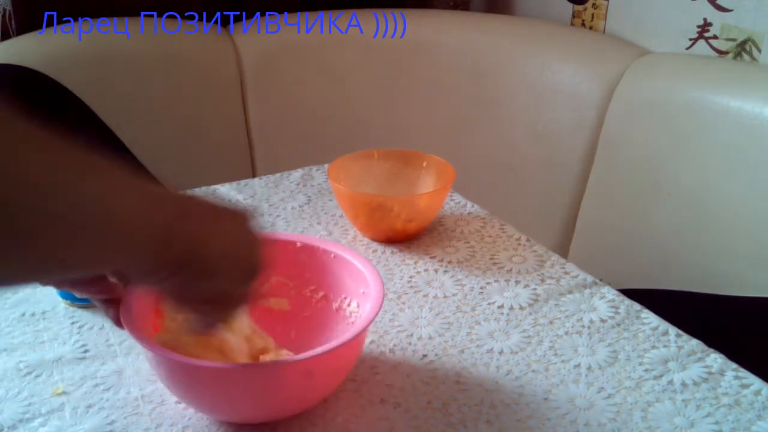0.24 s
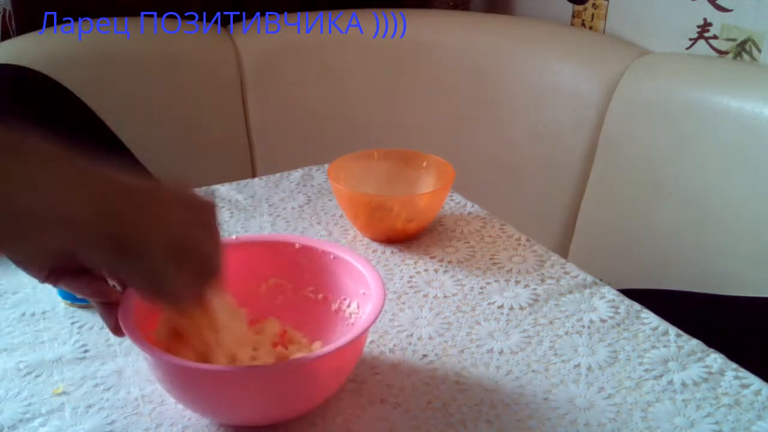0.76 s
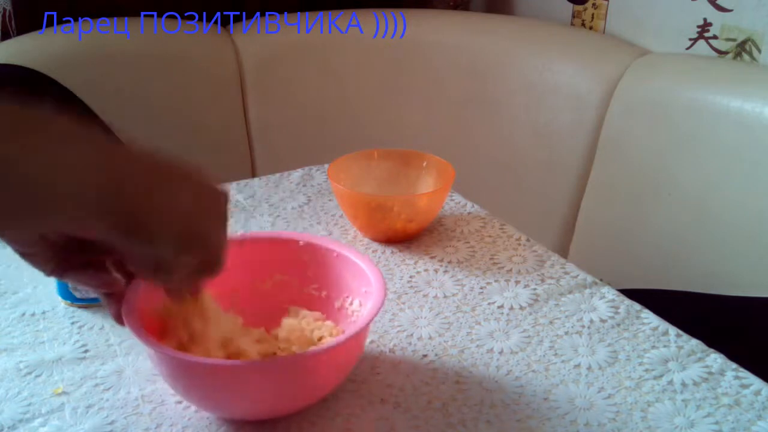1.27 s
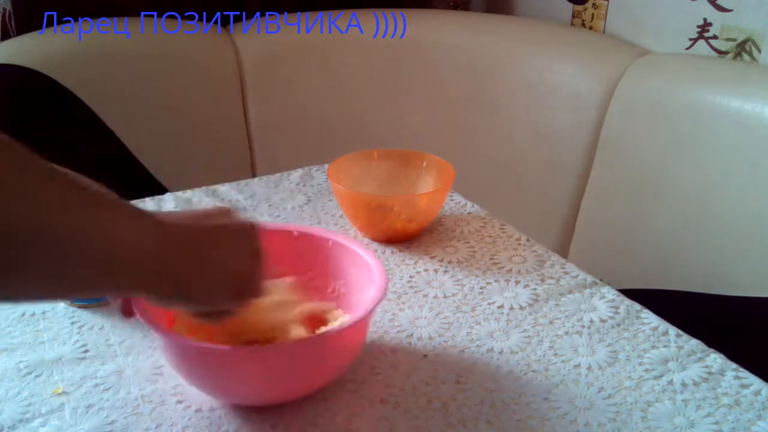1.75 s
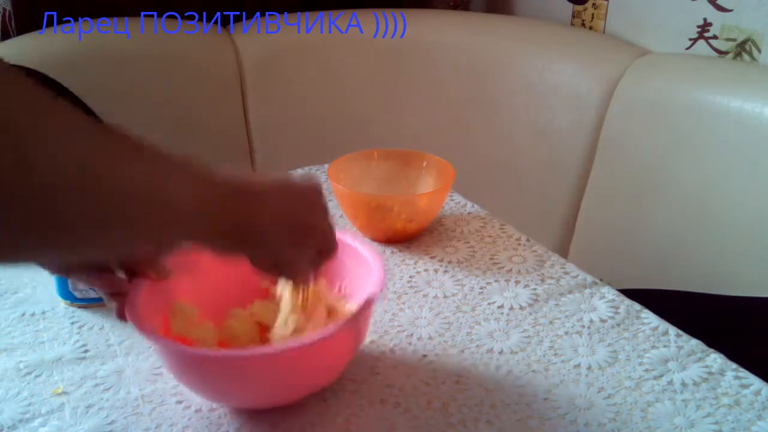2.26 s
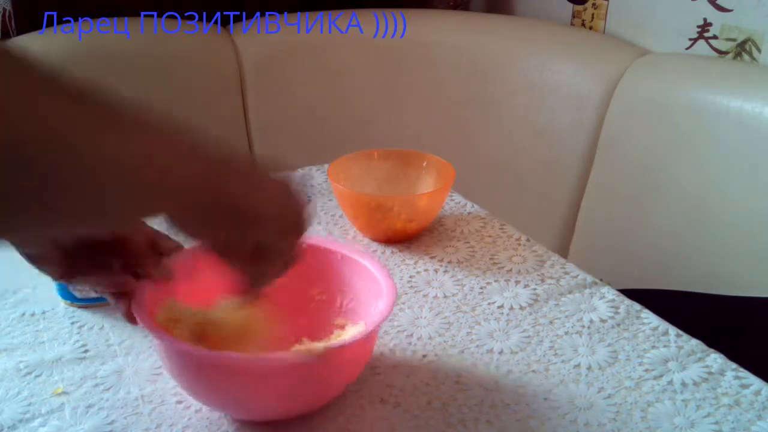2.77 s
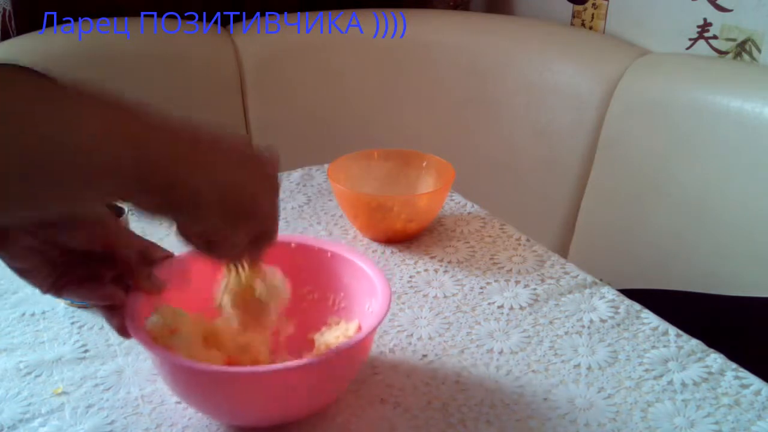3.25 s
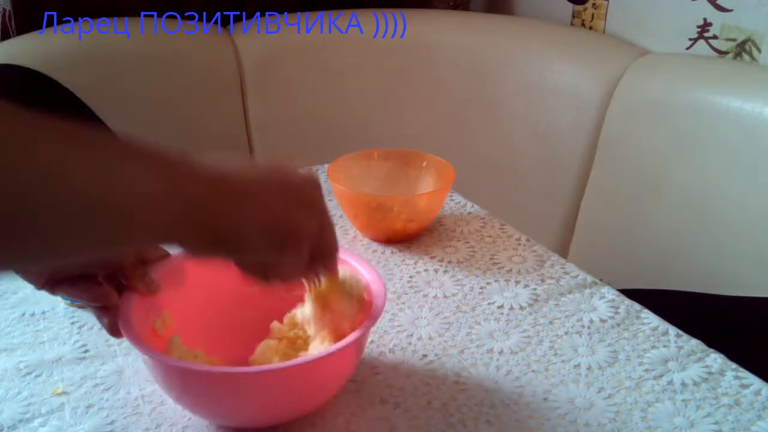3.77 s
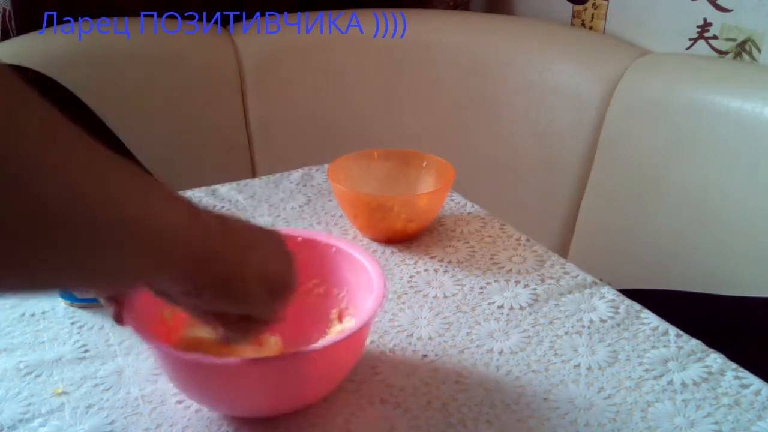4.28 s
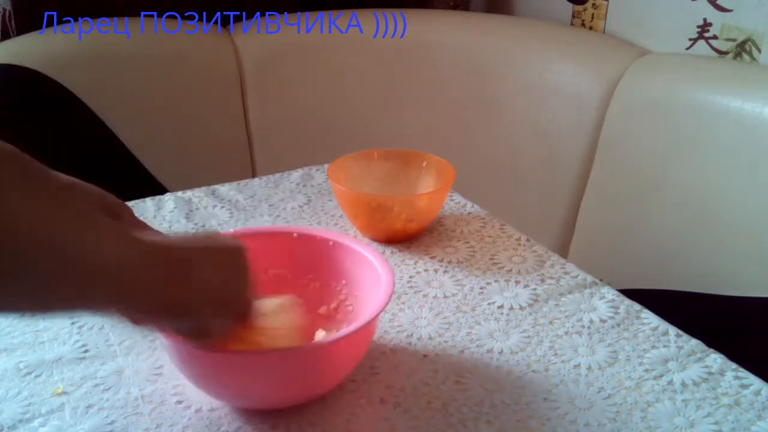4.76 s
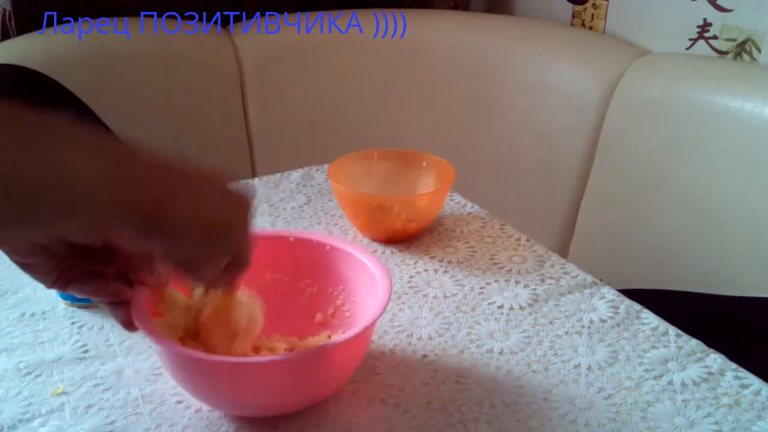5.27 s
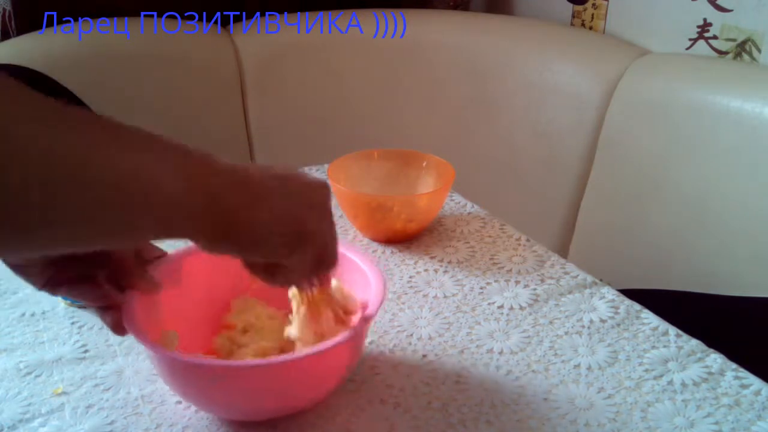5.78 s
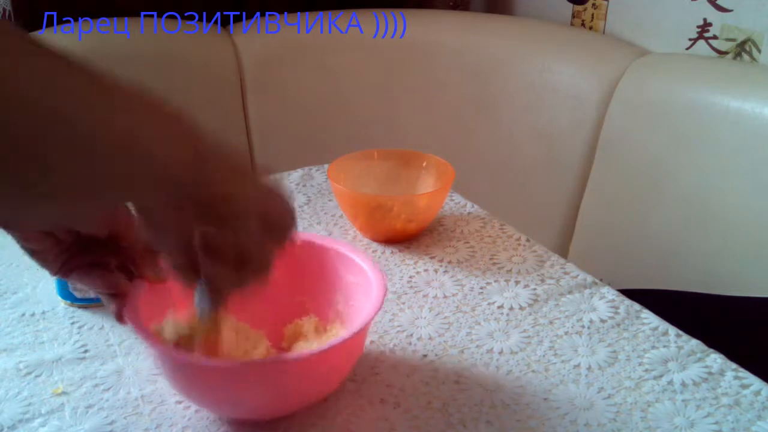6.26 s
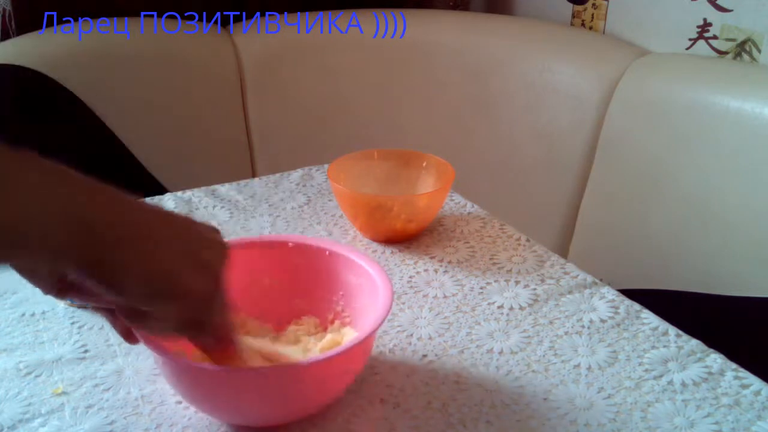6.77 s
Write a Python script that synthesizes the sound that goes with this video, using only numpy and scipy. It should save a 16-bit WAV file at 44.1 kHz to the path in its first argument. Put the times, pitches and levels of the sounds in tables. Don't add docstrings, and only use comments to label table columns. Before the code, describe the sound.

A spoon works a stiff sugary mass in a plastic bowl, with dry rasping strokes, hollow knocks and dull table bumps in a small room.

```python
import sys
import numpy as np
from scipy import signal
from scipy.fft import rfft, irfft
from scipy.io import wavfile

SR = 44100
rng = np.random.default_rng(int(sys.argv[2]) if len(sys.argv) > 2 else 0)


def gain_from_decibels(decibels):
    exponent = np.asarray(decibels, float) / 20
    return 10 ** exponent


def output_pcm(signal):
    pcm = np.clip(np.atleast_2d(signal).T, -1, 1) * 32767
    wavfile.write(sys.argv[1], SR, np.round(pcm).astype(np.int16))


N = 310023

# start_s [s], knock_db [dB], pitch_hz [Hz], table_ring_db [dB]
BLOWS = [(1.3388, -13.5, 700, -28), (1.424, -31.5, 704, -39.5), (1.789, -49, 300, -52),
         (1.7975, -33, 970, -29.5), (1.7991, -10, 718, -20), (2.18, -31.5, 630, -49),
         (2.262, -33, 600, -57), (2.267, -30.5, 658, -36), (2.5927, -23.5, 1110, -25),
         (2.5945, -17.5, 710, -33), (2.6025, -9, 700, -25), (2.998, -26.5, 880, -29.5),
         (3.0104, -43.5, 910, -63), (3.903, -25, 770, -33.5), (3.911, -20.5, 723, -30.5),
         (4.3153, -4, 716, -20.5), (4.525, -33, 600, -42), (4.764, -44.5, 600, -47.5),
         (4.881, -44, 600, -51.5), (5.207, -40.5, 504, -42.5), (5.222, -18.5, 745, -32.5),
         (5.686, -47.5, 600, -59.5), (6.338, -37.5, 550, -40), (6.451, -39, 600, -44.5),
         (6.787, -39, 640, -51), (6.935, -37.5, 1000, -72)]
# mode_hz [Hz], level_db [dB], t60_s [s]
TABLE_TOP = [(269.2, -4, 0.16), (307.7, 8.5, 0.03), (338.8, 6.5, 0.078), (430.6, -2.5, 0.075),
             (550, -10.5, 0.063)]
# mode_hz [Hz], level_db [dB], t60_s [s]
FRAME = [(53.6, -14.5, 0.3), (101, -4.5, 0.09), (131, 3, 0.11), (221.7, -9.5, 0.4)]


def rms_one(x):
    return x / np.sqrt(np.mean(x ** 2) + 1e-20)


def drift(rate_hz):
    r = np.exp(-64 * np.pi * rate_hz / SR)
    slow = signal.lfilter([1], [1, -2 * r, r * r], rng.standard_normal(N // 32 + 1002))
    slow = rms_one(slow[1000:])
    return np.interp(np.arange(N) / 32, np.arange(len(slow)), slow)


def grains(per_s, spread_db):
    sizes = gain_from_decibels(spread_db * np.minimum(rng.exponential(1, N), 5))
    signs = rng.choice([-1, 1], N)
    return rms_one(sizes * signs * (rng.random(N) < per_s / SR))


def swell(start_s, length_s):
    first = max(round((start_s - 2 * length_s) * SR), 0)
    last = min(round((start_s + 2 * length_s) * SR), N)
    near = np.arange(first, last)
    return near, np.exp(-(2 * (near / SR - start_s) / length_s) ** 2)


def ring(force, modes):
    out = 0
    for k, (hz, db, t60_s) in enumerate(modes):
        r = gain_from_decibels(-60 / (t60_s * SR))
        w = 2 * np.pi * hz / SR
        poles = [1, -2 * r * np.cos(w), r * r]
        out = out + (-1) ** k * gain_from_decibels(db) * signal.lfilter([0, np.sin(w)], poles, force + 1e-18)
    return out


def resonate(x, peaks):
    out = 0
    for k, (hz, width_hz, db) in enumerate(peaks):
        r = np.exp(-np.pi * width_hz / SR)
        zeros = [(1 - r * r) / 2, 0, (r * r - 1) / 2]
        poles = [1, -2 * r * np.cos(2 * np.pi * hz / SR), r * r]
        out = out + (-1) ** k * gain_from_decibels(db) * signal.lfilter(zeros, poles, x + 1e-18)
    return out


def knocks(cycles=0.99):
    out = np.zeros(N)
    t = np.arange(600) / SR
    for start_s, knock_db, hz, _ in BLOWS:
        at = round((start_s - 3 / 4 / hz) * SR)
        swing = hz * t * np.sin(2 * np.pi * hz * t) * np.exp(-(hz * t / cycles) ** 2)
        out[at:at + 600] += gain_from_decibels(knock_db + 8.0) * swing
    return out


def strikes(db):
    out = np.zeros(N)
    out[np.round(np.array(BLOWS)[:, 0] * SR).astype(int)] = gain_from_decibels(db)
    return out


def table():
    ring_db = np.array(BLOWS)[:, -1]
    thump_db = -39 + 0.7 * (ring_db + 30)
    body = ring(strikes(thump_db), FRAME) - ring(strikes(ring_db), TABLE_TOP)
    cover = signal.butter(2, 600, fs=SR, output="sos")
    return signal.sosfilt(cover, body)


def ticks(chatter_s=0.0037, onset_s=0.0012):
    # start_s [s], crack_db [dB peak], bright_db [dB peak]
    tip_hits = [(1.3422, -36.5, -62), (1.421, -41.5, -69), (1.7941, -25.5, -67), (1.7969, -26.5, -33.5),
                (1.8098, -27, -34.5), (2.182, -50.5, -63), (2.269, -47.5, -64), (2.588, -41.5, -60),
                (2.5909, -33.5, -55), (2.599, -27, -57), (2.998, -43, -67), (3.004, -36.5, -68),
                (3.397, -74, -61), (3.9024, -50, -61), (3.912, -41, -56), (4.313, -20.5, -38.5),
                (4.3242, -25.5, -41), (4.7651, -65, -64), (5.221, -35.5, -61.5), (5.233, -35, -57),
                (6.34, -64, -57.5), (6.447, -54, -72), (6.935, -53, -69)]
    # peak_hz [Hz], width_hz [Hz], level_db [dB]
    rim = [(1787, 960, 0.5), (2647, 955, 1), (3150, 760, -3)]
    # peak_hz [Hz], width_hz [Hz], level_db [dB]
    spoon_tip = [(4580, 2000, 8), (7200, 1700, -4), (9000, 1600, -3)]
    out = np.zeros(N)
    t = np.arange(1500) / SR
    shape = (len(tip_hits), len(t))
    contacts = gain_from_decibels(2.87 * rng.exponential(1, shape)) * rng.choice([-1, 0, 0, 1], shape)
    envelope = np.exp(-t / chatter_s) * (1 - np.exp(-t / onset_s))
    for (start_s, crack_db, bright_db), chatter in zip(tip_hits, contacts):
        at = round(start_s * SR)
        for db, peaks in (crack_db - 0.5, rim), (bright_db, spoon_tip):
            sound = resonate(chatter * envelope, peaks)
            out[at:at + len(t)] += gain_from_decibels(db) * sound / np.abs(sound).max()
    return signal.sosfilt(signal.butter(2, 9000, fs=SR, output="sos"), out)


def stirring(patchy_db=3.5, cycles=21.0):
    # start_s [s], length_s [s], rasp_db [dB], hiss_db [dB]
    strokes = [(0, 0.038, -65.5, -87), (0.137, 0.19, -56, -75), (0.346, 0.083, -73.5, -80),
               (0.566, 0.29, -74, -98), (0.714, 0.075, -65, -94), (1.105, 0.29, -69, -89),
               (1.43, 0.18, -71.5, -87), (1.553, 0.029, -66, -63), (1.604, 0.13, -60.5, -74.5),
               (1.988, 0.14, -56.5, -65.5), (2.182, 0.047, -73, -72), (2.316, 0.15, -65.5, -78),
               (2.417, 0.091, -62.5, -78), (2.798, 0.17, -59.5, -66.5), (3.094, 0.5, -70, -92),
               (3.296, 0.1, -60.5, -81), (3.402, 0.017, -80, -72), (3.715, 0.2, -61, -84),
               (4.136, 0.14, -59.5, -75), (4.244, 0.047, -64, -71), (4.536, 0.11, -69.5, -77),
               (4.652, 0.085, -64.5, -70), (5.001, 0.18, -65, -73.5), (5.366, 0.16, -65.5, -82),
               (5.766, 0.17, -68, -80.5), (5.861, 0.07, -62, -71), (6.183, 0.18, -64, -78),
               (6.494, 0.17, -72.5, -79), (6.679, 0.14, -67, -77), (6.937, 0.16, -70.5, -89)]
    # peak_hz [Hz], width_hz [Hz], level_db [dB]
    spoon_edge = [(1400, 260, -16.5), (2315, 760, 5.5)]
    # peak_hz [Hz], width_hz [Hz], level_db [dB]
    wall_rasp = [(3100, 1600, -7), (4420, 2320, -1), (6120, 1770, 1)]
    # peak_hz [Hz], width_hz [Hz], level_db [dB]
    fine_hiss = [(9370, 1560, 2), (10800, 980, -7.5)]
    effort = np.zeros((3, N))
    for start_s, length_s, rasp_db, hiss_db in strokes:
        edge_db = -66.5 + 0.79 * (rasp_db + 65)
        near, shape = swell(start_s, length_s)
        effort[:, near] += gain_from_decibels([edge_db, rasp_db, hiss_db])[:, None] * shape
    crystals = grains(4500, spread_db=0.5) * gain_from_decibels(2.0 * drift(25))
    out = 0
    for k, hz in enumerate(np.geomspace(1250, 13500, 48)):
        shares = []
        for peaks in (spoon_edge, wall_rasp, fine_hiss):
            shares.append(sum(gain_from_decibels(db) / (1 + (2 * (hz - f) / w) ** 2) for f, w, db in peaks))
        flicker = gain_from_decibels(patchy_db * drift(21.24))
        note = (-1) ** k * resonate(crystals * flicker, [(hz, hz / cycles, 0)])
        out = out + (np.array(shares) @ effort) * note
    return gain_from_decibels(6.0) * out


def snaps(length_s=0.02, relative_width=0.2):
    # start_s [s], level_db [dB], pitch_hz [Hz]
    lumps = [
        (1.345, -67.5, 11200),
        (1.87, -65, 12400),
        (2.19, -67, 12400),
        (2.297, -68, 12300),
        (2.609, -58.5, 11300),
        (3.41, -62, 7300),
        (3.915, -65, 9000),
        (4.25, -60.5, 9920),
        (6.34, -72, 9200),
        (6.47, -67, 7500),
    ]
    cracks = grains(3000, spread_db=4.0)
    out = np.zeros(N)
    for start_s, db, hz in lumps:
        near, shape = swell(start_s, length_s)
        peak = [(hz, relative_width * hz, 0)]
        fizz = resonate(resonate(shape * cracks[near], peak), peak)
        out[near] += gain_from_decibels(db) * rms_one(fizz)
    return out


def shoves(top_hz=320, width_hz=89.0):
    # start_s [s], length_s [s], top_db [dB peak], bowl_db [dB peak]
    slides = [(0.119, 0.1, -57, -56.5), (1.936, 0.038, -40, -51), (2.077, 0.035, -39.5, -54),
              (2.171, 0.038, -36, -48), (2.34, 0.016, -49, -47.5), (4.242, 0.051, -42, -51.5),
              (4.55, 0.026, -64, -51), (4.778, 0.017, -42, -43.5), (4.874, 0.02, -41.5, -47.5),
              (4.91, 0.039, -53, -53), (5.692, 0.04, -46, -57), (5.748, 0.037, -63, -50.5),
              (6.16, 0.047, -46, -53.5), (6.449, 0.02, -39.5, -44.5), (6.501, 0.019, -48, -55),
              (6.676, 0.061, -57.5, -55), (6.841, 0.11, -48, -61), (6.945, 0.047, -63, -50.5)]
    # start_s [s], length_s [s], top_db [dB peak], bowl_db [dB peak]
    rocks = [(2.187, 0.03, -39.5, -53), (2.268, 0.027, -31, -39), (2.927, 0.061, -46, -63),
             (3.151, 0.017, -49, -72), (3.326, 0.053, -50.5, -56), (3.668, 0.066, -58, -65),
             (4.068, 0.05, -44, -49), (6.033, 0.067, -49, -72), (6.342, 0.024, -46.5, -45),
             (6.401, 0.027, -45, -45), (6.782, 0.011, -38.5, -56.5)]
    # time_s [s], level_db [dB]
    hand = [(0.0, -61), (0.3, -68.5), (1.6, -64), (1.98, -51.5), (2.2, -59), (2.429, -57.5), (2.64, -65),
            (3.1, -47), (3.44, -68.5), (4.0, -57), (4.27, -66), (4.42, -42.5), (4.8, -68), (5.05, -63.5),
            (5.7, -92), (6.13, -56.5), (6.499, -78.5), (6.95, -61.5)]
    bowl = [(600, 218, 3), (779, 407, 0), (1243, 480, -7.0)]   # peak_hz, width_hz, level_db
    bumps = grains(1000, spread_db=3.0)
    creep = gain_from_decibels(np.interp(np.arange(N) / SR, *np.transpose(hand))) * bumps
    out = gain_from_decibels(-46.5) * ring(creep, TABLE_TOP) + gain_from_decibels(5.0) * resonate(creep, bowl)
    pushes = [(*row, -19) for row in slides] + [(*row, -5.5) for row in rocks]
    for start_s, length_s, top_db, bowl_db, frame_db in pushes:
        near, shape = swell(start_s, length_s)
        first = near[0]
        force = np.pad(shape * bumps[near], (0, SR // 4))[:N - first]
        top = resonate(force, [(top_hz, width_hz, 0)])
        top = resonate(top, [(top_hz, 4 * width_hz, 0)])
        bodies = [(top_db, top), (bowl_db, resonate(force, bowl)),
                  (top_db + frame_db, ring(force, FRAME[1:]))]
        for db, body in bodies:
            out[first:first + len(force)] += gain_from_decibels(db) * body / np.abs(body).max()
    return out


def room(x, tail_db=-32.5, echo_cut_hz=5000.0, build_s=0.024):
    # delay_ms [ms], gain [ratio]
    reflections = [(4.65, 0.15), (6.76, 0.12), (11.29, 0.14), (12.4, 0.2), (16.12, 0.23), (18.37, 0.16),
                   (20.05, 0.22), (21.29, 0.28), (22.59, 0.17), (24.9, 0.16), (28.1, -0.17), (33.63, -0.12),
                   (37.3, -0.19), (50.09, -0.12), (51.59, -0.16), (64.13, 0.12)]
    # mid_hz [Hz], level_db [dB], t60_s [s]
    tail_bands = [(129.26, -3.5, 0.41), (336, -10.5, 0.43), (472, -5.5, 0.45), (790, 2, 0.38),
                  (1414, 6.5, 0.34), (2260, 0, 0.4), (4660, 3, 0.35), (9240, 3, 0.2)]
    t = np.arange(SR // 2) / SR
    response = np.zeros(len(t))
    hz = np.array(tail_bands)[:, 0]
    borders = np.concatenate([[40], np.sqrt(hz[1:] * hz[:-1]), [17000]])
    for (mid_hz, db, t60_s), low, high in zip(tail_bands, borders, borders[1:]):
        band_pass = signal.butter(2, [low, high], "band", fs=SR, output="sos")
        band = signal.sosfilt(band_pass, rng.standard_normal(len(t)))
        build = build_s * min(1, 1000 / mid_hz)
        response += band * gain_from_decibels(tail_db + db - 60 * t / t60_s) * (1 - np.exp(-(t / build) ** 2))
    echoes = np.zeros(len(t))
    for delay_ms, gain in reflections:
        echoes[round(delay_ms * SR / 1000)] = gain
    response += gain_from_decibels(-1.0) * signal.filtfilt(*signal.butter(1, echo_cut_hz, fs=SR), echoes)
    response[0] = 1
    return signal.fftconvolve(x, response)[:N]


def room_tone(level_db=-63.5):
    # point_hz [Hz], level_db [dB]
    floor = [(15, -51), (25, -23), (64, -4), (122, -0.5), (227, 1.5), (523, -4.5), (703, -4), (1240, -8.5),
             (3340, -13.5), (5880, -12), (8130, -24), (10100, -24), (15500, -30)]
    hz = np.fft.rfftfreq(N, 1 / SR)
    points_hz, points_db = np.transpose(floor)
    colour = gain_from_decibels(np.interp(np.log(hz + 1), np.log(points_hz), points_db))
    noise = rms_one(irfft(rfft(rng.standard_normal(N)) * colour, N))
    return gain_from_decibels(level_db - 2.5 + 0.25 * drift(1.06)) * noise


def scene():
    no_bass = signal.butter(2, 36, "high", fs=SR, output="sos")
    below = signal.sosfilt(no_bass, table() + shoves())
    contacts = knocks() + ticks() + below + stirring() + gain_from_decibels(-12.5) * snaps()
    return (room(contacts) + room_tone())[None]


def roll_off(x):
    return signal.sosfilt(signal.butter(12, 15950, fs=SR, output="sos"), x)


def record(dry):
    return roll_off(dry)


dry = scene()
out = record(dry)
output_pcm(out)
```